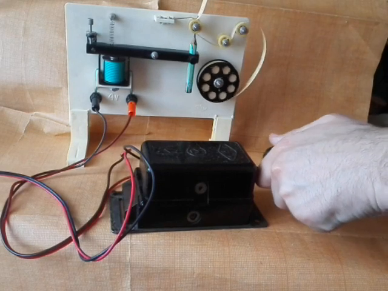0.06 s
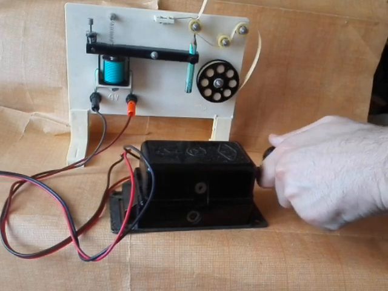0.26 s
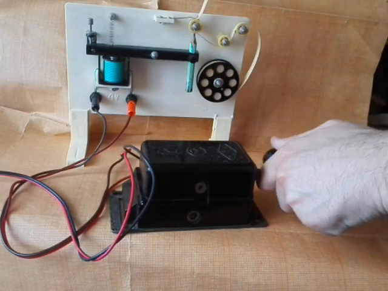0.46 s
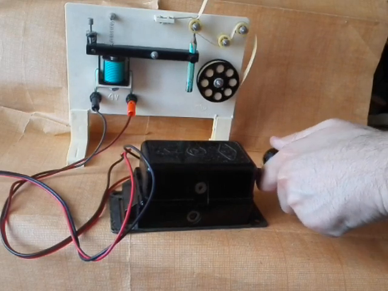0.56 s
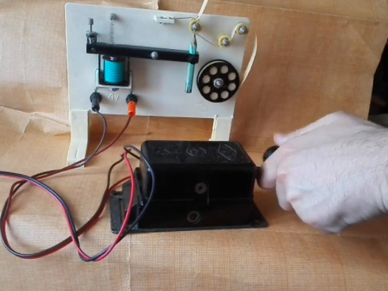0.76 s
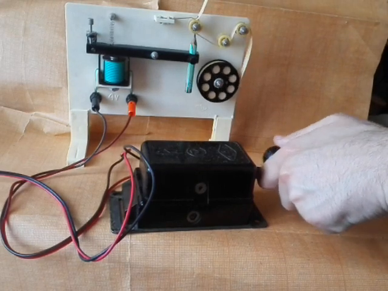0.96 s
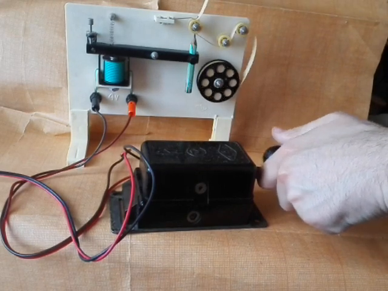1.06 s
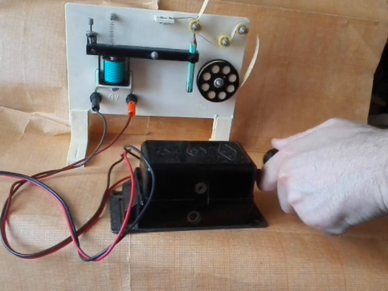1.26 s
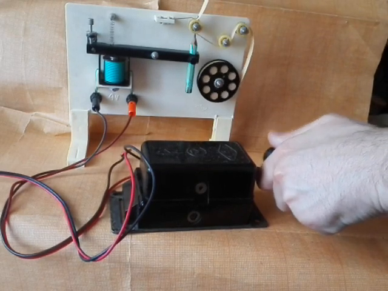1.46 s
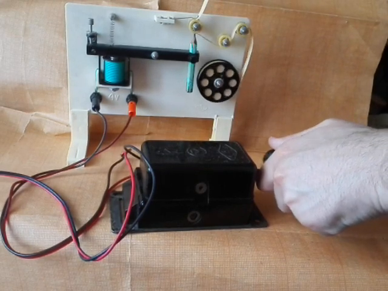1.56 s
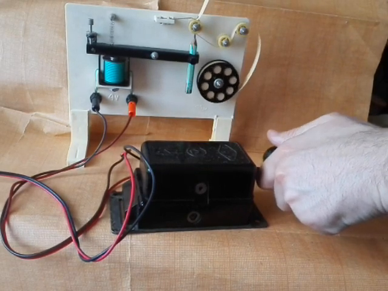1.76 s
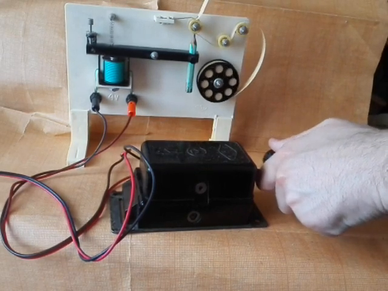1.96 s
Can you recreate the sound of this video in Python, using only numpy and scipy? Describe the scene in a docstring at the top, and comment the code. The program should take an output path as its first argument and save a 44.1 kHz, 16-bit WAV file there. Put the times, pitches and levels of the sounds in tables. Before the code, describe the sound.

Five sharp click-clack strokes of a telegraph lever in a small, quiet room.

```python
"""A soft rub of the hand, then five click-clack strokes of a model telegraph in a small room.
At each press an electromagnet slaps the lever onto its core; at each release a spring throws it back
on its stop. Each impact excites the normal modes of lever and frame, which clatter and die away, while
the spring sings on faintly. The key thumps the cloth-covered table and rubs softly between strokes."""
import sys
import numpy as np
from scipy import signal
from scipy.fft import rfft, irfft
from scipy.io import wavfile
from scipy.ndimage import uniform_filter1d

SR = 44100
rng = np.random.default_rng(int(sys.argv[2]) if len(sys.argv) > 2 else 0)


def dump(signal):
    """Clip the signal to [-1, 1] and save it as 16-bit WAV at the path in sys.argv[1]."""
    limited = np.clip(np.atleast_2d(signal).T, -1, 1)
    pcm = np.round(limited * 32767).astype(np.int16)
    wavfile.write(sys.argv[1], SR, pcm)


N = 88200
T = np.arange(N) / SR
HZ = np.maximum(np.arange(N // 2 + 1) * SR / N, 1)

# Hand rubbing on key. Each row: start and length in seconds, level in dB, centre in Hz,
# relative level of the low murmur in dB.
HAND_RUBS = [(0.126, 0.11, -54.5, 1520, -6.5), (0.485, 0.022, -56.5, 1200, 6),
             (0.725, .07, -58.5, 2000, -12), (0.842, 0.11, -57, 1580, -10.5),
             (1.14, 0.041, -55.5, 3400, -18.5), (1.245, 0.035, -57, 1500, 5), (1.51, 0.12, -59.5, 1605, -6),
             (1.698, 0.083, -52, 1600, -10), (1.976, 0.057, -61, 1700, -6.5)]
# Lever striking the core. Each row: start in seconds, level in dB, brightness in dB per octave.
PULLS = [(0.2108, -1, 0.5), (0.5039, -1.5, 0), (0.924, -1, 0.5), (1.277, -1.5, 0), (1.5918, -2, -0.5)]
# Lever striking its stop. Each row: as for a pull, then spring level in dB, spring tilt in dB per octave.
RETURNS = [(.3062, 0.5, -0.5, 3.5, -3.5), (0.6405, 1, 0, 7.5, -5.5), (1.0043, 2, 0, 3, 0),
           (1.3826, 3, 0, -2.5, 2), (1.7424, 0.5, 0, -5, 1)]
# Key settling after release. Each row: start in seconds, level in dB.
KEY_RESTS = [(0.331, -6), (.67, -6.5), (1.019, -2), (1.398, -1.5), (1.765, -7.5)]

# Normal modes. Each _HZ list holds natural frequencies in Hz, matched by the rows of its _MODES table.
# Each row: level in dB, 60 dB decay time in seconds, left-right difference in dB.
TABLE_HZ = [58, 99, 146, 188, 243, 275]   # table top
TABLE_MODES = [(-62, 0.35, -2), (-39.5, 0.29, -0.5), (-46, 0.24, -0.5), (-47.5, 0.31, -3),
               (-41.5, 0.19, 2.5), (-41.5, .1, -2)]
PULL_HZ = [870, 1076, 2405, 3270, 3890, 4877, 5009, 5295, 5340, 5383, 6358, 6481, 7633, 8145]   # lever on the core
PULL_MODES = [(-30.5, .09, 0), (-28.5, .11, -6), (-34, .16, 14), (-36.5, 0.18, 13.5), (-30, 0.14, 9.5),
              (-23.5, 0.17, 7.5), (-23, 0.16, 10), (-18.5, .11, 10), (-22, .11, 7.5), (-21, 0.084, 6.5),
              (-24, 0.12, 16.5), (-27.5, 0.049, 10), (-30, .12, 0), (-27.5, .1, 6)]
RETURN_HZ = [450, 775, 2794, 3850, 4735, 5147, 5184, 5514, 6470, 6610, 8152]   # lever on its stop
RETURN_MODES = [(-43.5, 0.054, 2), (-34.5, 0.066, -9.5), (-30.5, .08, 8.5), (-39, .09, 12.5),
                (-32, 0.11, 6), (-18.5, 0.086, 13), (-19, 0.12, 8.5), (-29, 0.1, 13), (-24.5, 0.042, 19.5),
                (-23.5, 0.036, 10), (-30.5, 0.12, 6)]
SPRING_HZ = [1217, 2433, 4032, 5165, 5520]   # return spring
SPRING_MODES = [(-56.5, .9, -4), (-59.5, 0.52, -8), (-64.5, 1, 8), (-52, 1.0, 10.5), (-50, .25, 7.5)]
# Broad frame resonances. Each row: centre and width in Hz, lift in dB, left-right difference in dB.
FRAME_RESONANCES = [(446, 81, 3.5, 1), (770, 130, 4.5, -8), (1020, 150, 9, -8), (1368, 223, 7, -11),
                    (1597, 56, 2.5, 5), (2046, 130, 4.5, 2.5), (2740, 430, 5.5, 3), (3235, 66, 5, -4),
                    (3690, 220, 5.5, -1.5), (3907, 190, 8.5, 3.5), (4320, 91, 6.5, -0.5), (6480, 350, 6, 4),
                    (8300, 330, 2, -1)]

# Spectra of room tone, the two clatters and reverberation. Each row: frequency in Hz, relative level in dB.
ROOM_TONE_COLOUR = [(25, -14), (60, -5.5), (120, 1.5), (250, -10), (600, -15.5), (1600, -13.5), (3500, -16),
                    (8000, -23), (14000, -28.5)]
PULL_COLOUR = [(60, -28), (200, -5), (350, -13), (650, -5.5), (1000, -5), (2200, 1), (4200, -1.5),
               (5300, 10.5), (5900, 1), (7800, 5), (8800, -2), (10000, -2), (11500, -7.5), (14000, -7.5)]
RETURN_COLOUR = [(60, -31), (230, -13.5), (430, -4), (700, -7), (1000, -5), (1600, -0.5), (2300, 3.5),
                 (2800, 2), (4800, 0.5), (6300, 1.5), (7200, -2), (8200, -7), (9200, -12), (14000, -13.5)]
REVERB_COLOUR = [(60, -10.5), (250, 4), (450, -11), (1000, -4), (1900, -4), (3500, -0.5), (6000, -4.5),
                 (9000, -14), (14000, -18)]
# Stereo balance. Each row: frequency in Hz, left-right difference in dB.
BALANCE = [(100, 2), (600, -1), (1400, -2), (3300, 2), (4800, 4), (6000, 6.5), (7300, 5.5), (9000, 6),
           (10000, 9), (14000, 2.5)]

LAG_S = np.array([[.00016], [0]])   # sound reaches the left side later
ATTACK_S, CRACK_T60_S, ECHO_S, ECHO_DB = .0005, .018, .0093, -13
REVERB_BUILD_S, REVERB_T60_S = .019, .33
COMMON_SHARE = .76   # fraction of clatter power that repeats from blow to blow


def from_db(db):
    """Amplitude ratio of a level in decibels."""
    return 10 ** (np.asarray(db) / 20)


def spectrum_db(points):
    """Levels interpolated over logarithmic frequency."""
    hz, db = np.transpose(points)
    return np.interp(np.log(HZ), np.log(hz), db)


def pan(db):
    """A level difference split evenly into left and right gains."""
    return from_db(np.array([[.5], [-.5]]) * db)


def decay(t60_s, hold_s=0):
    """Exponential damping: after a hold, a fall of 60 dB in t60_s."""
    return 1000. ** (-np.maximum(T - hold_s, 0) / t60_s)


def add(out, start_s, sound):
    """Superposition: a sound joins the mix at start_s."""
    start = int(np.clip(start_s * SR, 0, N - 1))
    out[:, start:] += sound[:, :N - start]


def noise(colour_db):
    """Partial coherence: coloured noise of unit rms, its two sides less alike in the treble."""
    mid, side = rfft(rng.standard_normal((2, N)))
    coherence = .75 / (1 + (HZ / 6000) ** 2)
    pair = np.sqrt(1 + coherence) * mid + np.sqrt(1 - coherence) * side * [[1], [-1]]
    delay = np.exp(-2j * np.pi * HZ * LAG_S)
    x = irfft(pair * delay * pan(spectrum_db(BALANCE)) * from_db(colour_db), N)
    return x / np.sqrt(np.mean(x ** 2))


def room_tone(level_db=-65):
    """Stationary noise: the room's faint, low background."""
    return from_db(level_db) * noise(spectrum_db(ROOM_TONE_COLOUR))


def rubs(width_oct=.59, edge_s=.015, murmur_hz=230):
    """Sliding friction: a band of noise from hand and key, over a murmur of the hand's weight."""
    def band(centre_hz):
        return noise(-20 * np.log10(1 + (np.log2(HZ / centre_hz) / width_oct) ** 4))

    out = np.zeros((2, N))
    for start_s, length_s, db, hz, murmur_db in HAND_RUBS:
        swell = np.clip(np.minimum(T, length_s - T) / edge_s, 0, 1)
        add(out, start_s, from_db(db) * swell * (band(hz) + from_db(murmur_db) * band(murmur_hz)))
    return out


def ring(pitches, modes, tilt_db=0, spread_db=1.5):
    """Modal vibration: damped sinusoids of alternating sign, their strengths varying with each blow."""
    out, t = 0, np.maximum(T - LAG_S, 0)
    for k, (hz, (db, t60_s, side_db)) in enumerate(zip(pitches, modes)):
        gain = from_db(db + tilt_db * np.log2(hz / pitches[0]) + spread_db * rng.standard_normal())
        out += (-1) ** k * gain * pan(side_db) * np.sin(2 * np.pi * hz * t) * decay(t60_s)
    return out * np.minimum(T / ATTACK_S, 1)


def key(lead_s=.0034, tick_db=-36, swell_s=.005):
    """Structure-borne sound: the key ticks and thumps the table before a pull, then settles more softly."""
    out, swell = np.zeros((2, N)), np.minimum(T / swell_s, 1)
    for start_s, db, _ in PULLS:
        tick = from_db(tick_db) * noise(spectrum_db(RETURN_COLOUR)) * decay(t60_s=.02)
        thump = swell * ring(TABLE_HZ, TABLE_MODES)
        add(out, start_s - lead_s, from_db(db) * (tick + thump))
    for start_s, db in KEY_RESTS:
        add(out, start_s, from_db(db) * swell * ring(TABLE_HZ, TABLE_MODES, tilt_db=-2))
    return out


def ripple(depth_db=4, spacing_hz=55.44):
    """Many small resonances: random narrow peaks and dips, in dB."""
    knots = np.arange(0, SR / 2, spacing_hz)
    return depth_db * np.interp(HZ, knots, rng.standard_normal(N)[:len(knots)])


def frame_response(colour):
    """Resonance: the frame lifts bands of a blow's spectrum, giving left and right gains."""
    db, side_db = spectrum_db(colour), spectrum_db(BALANCE)
    for hz, width_hz, lift_db, lean_db in FRAME_RESONANCES:
        peak = .5 ** ((2 * (HZ - hz) / width_hz) ** 2)
        db += lift_db * peak
        side_db += lean_db * peak
    return from_db(db) * pan(side_db)


def recolour(burst, gain, smooth_hz=220):
    """Spectral whitening evens a burst's chance peaks; gain then colours it at equal energy."""
    spectrum = rfft(burst)
    local_power = uniform_filter1d(np.abs(spectrum) ** 2, size=int(smooth_hz * N / SR), axis=-1)
    x = irfft(spectrum * gain / np.sqrt(local_power + 1e-12), N)
    return x * np.sqrt(np.sum(burst ** 2) / np.sum(x ** 2))


def lever(blows, pitches, modes, colour, crack_db, hold_s, clatter_db, t60_s, reverb_db):
    """Impact excitation: a crack and its reflection, frame clatter, lever modes and reverberation."""
    out, common = np.zeros((2, N)), noise(ripple())
    frame_gain = frame_response(colour)
    reverb_colour = spectrum_db(REVERB_COLOUR) + ripple()
    wall_echo = from_db(ECHO_DB) * (T > ECHO_S) * decay(CRACK_T60_S, ECHO_S)
    crack = from_db(crack_db) * (decay(CRACK_T60_S, hold_s) + wall_echo)
    envelope = np.minimum(T / ATTACK_S, 1) * np.hypot(crack, from_db(clatter_db) * decay(t60_s))
    tail = from_db(reverb_db) * np.minimum(T / REVERB_BUILD_S, 1) * decay(REVERB_T60_S)
    for start_s, db, bright_db, *_ in blows:
        burst = envelope * (np.sqrt(COMMON_SHARE) * common + np.sqrt(1 - COMMON_SHARE) * noise(0))
        clatter = recolour(burst, frame_gain * from_db(bright_db * np.log2(HZ)))
        add(out, start_s, from_db(db) * (clatter + ring(pitches, modes) + tail * noise(reverb_colour)))
    return out


def spring():
    """Free vibration: the spring sings after each return until the next pull stretches and damps it."""
    out = np.zeros((2, N))
    for start_s, _, _, db, tilt_db in RETURNS:
        next_pull_s = min((s for s, *_ in PULLS if s > start_s), default=N / SR)
        damping = decay(t60_s=.1, hold_s=next_pull_s - start_s)
        add(out, start_s, from_db(db) * ring(SPRING_HZ, SPRING_MODES, tilt_db) * damping)
    return out


def scene():
    """Superposition of lever, spring, key, rubs and room tone."""
    pulls = lever(PULLS, PULL_HZ, PULL_MODES, PULL_COLOUR,
                  crack_db=-9, hold_s=.0034, clatter_db=-12.5, t60_s=.11, reverb_db=-32)
    returns = lever(RETURNS, RETURN_HZ, RETURN_MODES, RETURN_COLOUR,
                    crack_db=-17, hold_s=.0033, clatter_db=-21.5, t60_s=.12, reverb_db=-44.5)
    return pulls + returns + spring() + key() + rubs() + room_tone()


def record(dry, gate_db=-56, knee_db=6, depth_db=5.5, window_s=.023, overload=1.5, cutoff_hz=14400):
    """Downward expansion lowers the quiet gaps; overloading peaks clip and a low-pass cuts the top."""
    power = uniform_filter1d(np.mean(dry ** 2, axis=0), size=int(window_s * SR))
    level_db = 10 * np.log10(np.abs(power) + 1e-12)
    gated = dry * from_db(-depth_db * np.clip((gate_db - level_db) / knee_db, 0, 1))
    low_pass = signal.ellip(10, .2, 80, cutoff_hz, fs=SR, output="sos")
    return signal.sosfilt(low_pass, np.clip(gated, -overload, overload))


dry = scene()
out = record(dry)
dump(out)
```